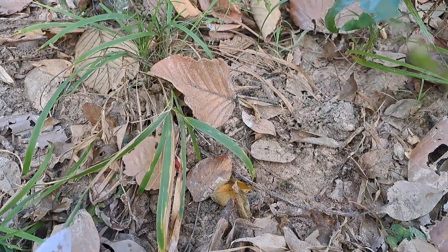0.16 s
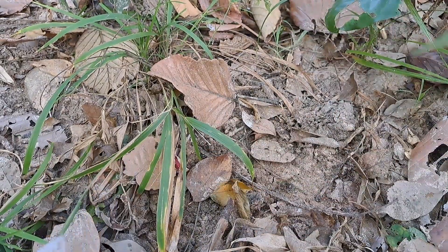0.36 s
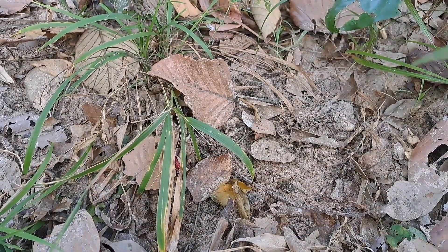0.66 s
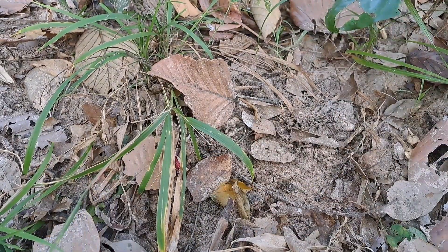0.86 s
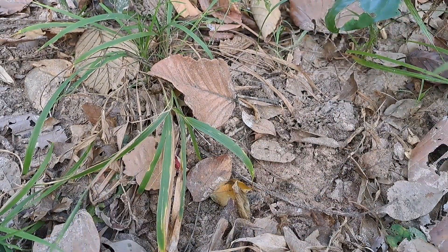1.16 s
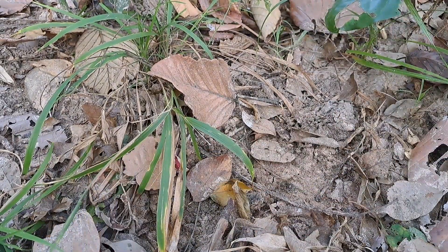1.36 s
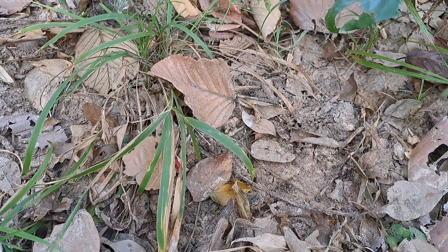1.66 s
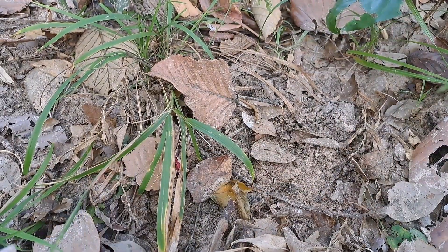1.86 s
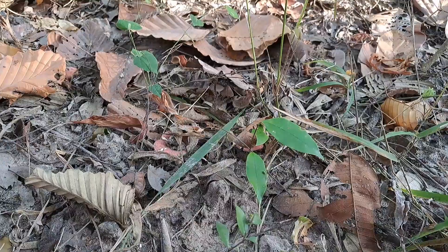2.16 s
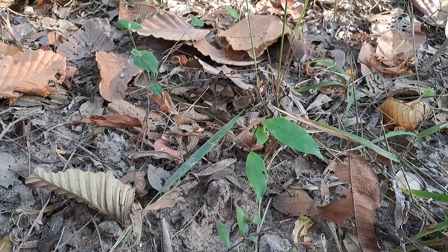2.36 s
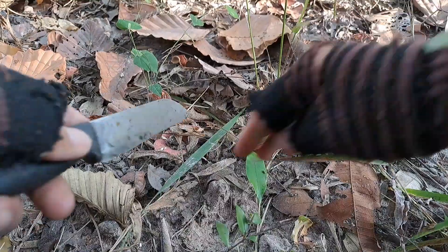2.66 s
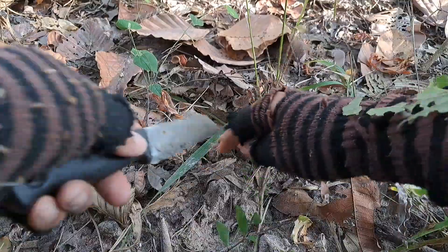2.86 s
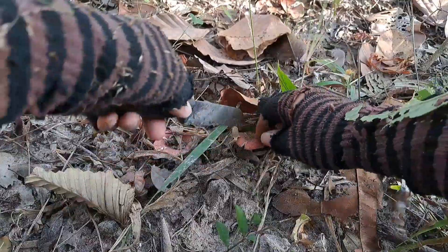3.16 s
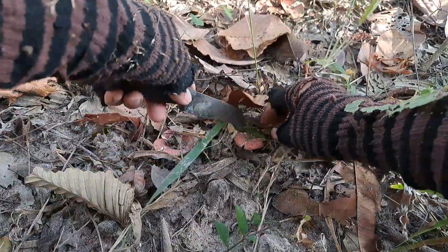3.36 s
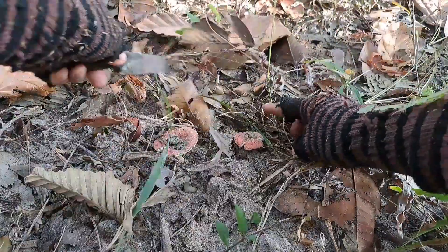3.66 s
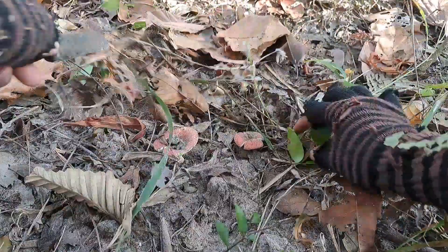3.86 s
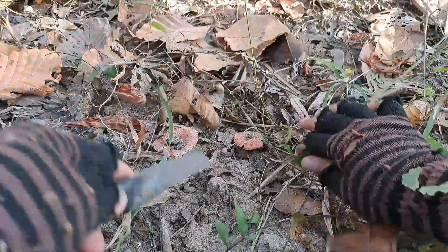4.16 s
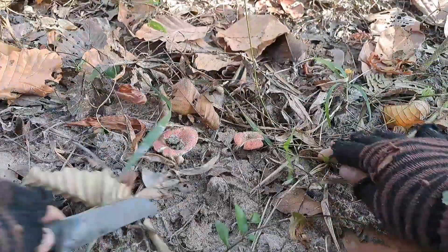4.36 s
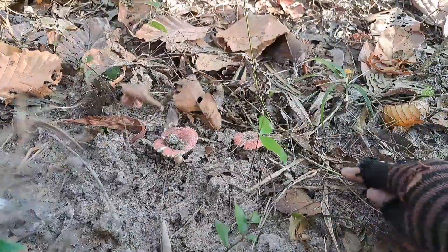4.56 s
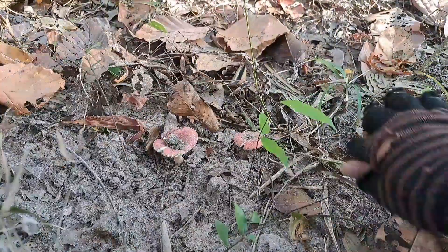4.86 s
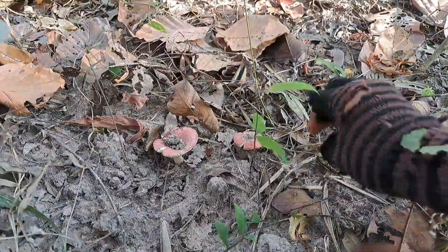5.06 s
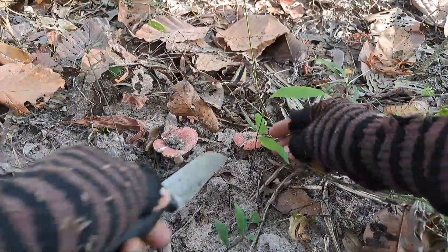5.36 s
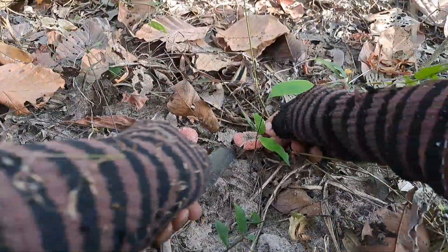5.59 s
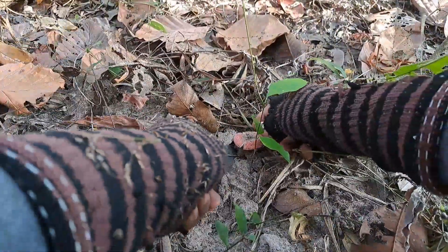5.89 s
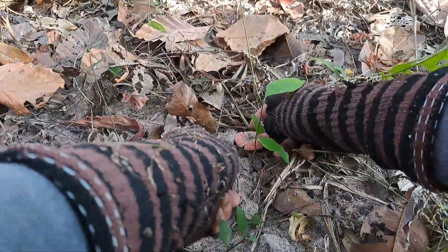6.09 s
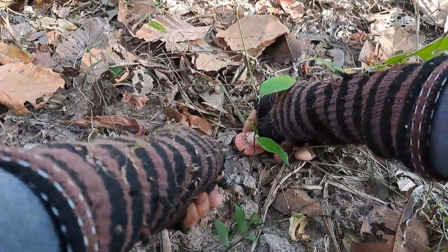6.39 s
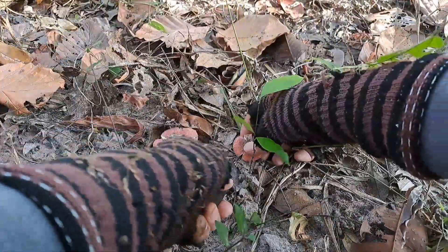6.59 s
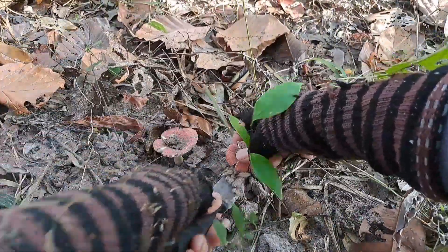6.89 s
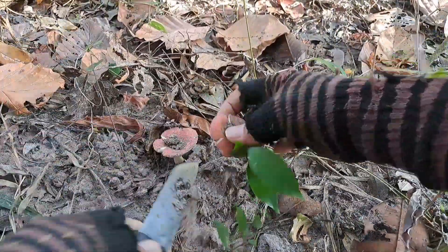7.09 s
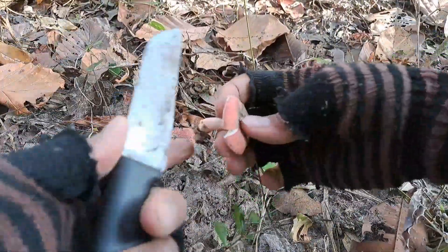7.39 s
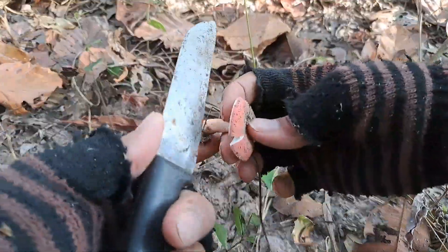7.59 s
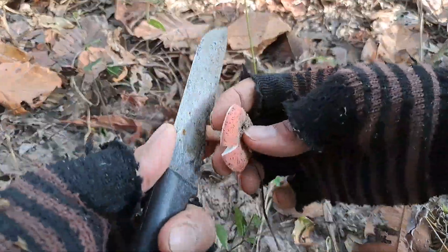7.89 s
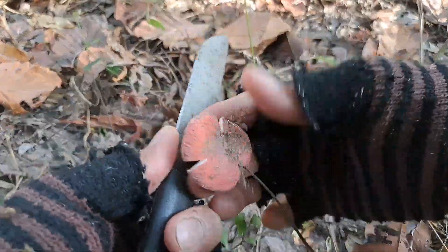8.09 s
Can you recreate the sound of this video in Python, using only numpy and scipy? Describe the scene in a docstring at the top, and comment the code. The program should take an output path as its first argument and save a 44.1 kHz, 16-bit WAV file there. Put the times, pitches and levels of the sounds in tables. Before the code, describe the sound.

Dry leaves rustle with tiny metal clinks, then gloved hands rake and sweep crackling litter aside before a knife quietly cuts into soil.

```python
"""Leaf litter stirs underfoot and a small piece of metal clinks; two broad sweeps and quiet cutting follow.
Forest floor, microphone ports of a handled camera close to gloved hands and a knife: dry leaves are raked
off, then a small mushroom is dug out. Strokes drive crowds of grains and friction noise for soil, scraping and
crackle. Noise bursts make the snaps and soft blows, damped sines the firm thumps, excited modes the clinks,
narrow resonances the blade. A thin whistle, soft low rumble and the hush of the wood lie behind."""
import sys
import numpy as np
from scipy import signal
from scipy.fft import rfft, irfft, next_fast_len
from scipy.io import wavfile
from scipy.ndimage import uniform_filter1d, map_coordinates

SR = 44100
rng = np.random.default_rng(int(sys.argv[2]) if len(sys.argv) > 2 else 0)


def wav_record(signal):
    """Record a signal, one row per channel, as 16-bit PCM in the file named by sys.argv[1]."""
    frames = np.transpose(np.atleast_2d(signal))
    bounded = np.clip(frames, -1, 1)
    # unit amplitude maps onto the largest positive 16-bit level
    quanta = np.round(bounded * 32767).astype(np.int16)
    wavfile.write(sys.argv[1], SR, quanta)


N = 363207
TIME = np.arange(N) / SR

# Strokes of hand, foot or blade through the litter: fastest moment t/s, rise/s, fall/s,
# level/dB before the layer gains, pressure on the soil/dB, left-right/dB
STROKE_MOVES = [(.045, 0.056, 0.067, -46, -40, 2.5), (.144, 0.098, 0.16, -45.5, -3, .5),
                (.335, 0.017, 0.084, -60.5, 6.5, -2), (.57, 0.39, 0.022, -51, -16.5, 1),
                (.745, 0.14, 0.15, -54.5, -14.5, -1), (.86, 0.016, 0.047, -44.5, -24, 1),
                (.907, 0.045, 0.059, -48.5, -1, -0.5), (1.037, 0.13, 0.052, -51, -5.5, 0.5),
                (1.164, 0.044, 0.045, -49.5, 1.5, 1.5), (1.305, 0.18, 0.21, -63.5, 3.5, 0),
                (1.445, 0.045, 0.23, -55, -0.5, -0.5), (1.596, 0.057, 0.028, -55, -4, -1),
                (1.795, 0.02, 0.028, -63, 6.5, -1), (1.875, 0.018, 0.016, -59.5, -10, -11),
                (1.963, .003, 0.04, -55, -1, -5), (2.013, 0.03, 0.09, -50.5, -3.5, -2.5),
                (2.278, 0.1, 0.067, -51.5, -8.5, -5), (2.38, .06, .06, -72, -2, 0),
                (2.658, 0.13, 0.12, -54.5, -8, -1.5), (2.77, 0.043, 0.043, -54, 4, -1.5),
                (2.93, 0.028, 0.033, -34.5, -13.5, 0.5), (2.97, 0.61, 0.25, -47, -7.5, -1),
                (3.125, 0.033, 0.1, -44, -11.5, 0.5), (3.28, 0.18, 0.2, -45.5, -7.5, -1),
                (3.463, 0.037, 0.1, -28.5, -13.5, -1), (3.551, 0.063, 0.022, -31.5, -7, -1.5),
                (3.672, 0.073, 0.24, -32.5, -13, -1), (3.834, 0.035, 0.03, -34.5, 0, -2),
                (3.95, .25, 0.65, -49, -8, -3), (4.199, 0.019, 0.048, -35.5, -15.5, -4.5),
                (4.42, 0.23, .15, -47, -7, -6), (4.538, 0.12, 0.12, -27, -13, .5),
                (4.656, 0.025, 0.15, -28.5, -12.5, 1), (4.81, 0.042, 0.13, -42, -4, -2.5),
                (5.03, 0.041, 0.26, -57, -13, -3), (5.231, 0.074, 0.16, -57, -3.5, -2.5),
                (5.358, 0.036, 0.09, -43, -13, -4.5), (5.729, 0.3, 0.35, -50.5, -4.5, -2.5),
                (5.895, 0.084, 0.22, -57.5, -13, -2.5), (6.026, 0.028, 0.097, -51, -9.5, -3.5),
                (6.33, 0.13, 0.22, -56, -6, -5), (6.45, 0.065, 0.1, -51, -10, -3),
                (6.535, 0.03, 0.078, -50, -15, -2.5), (6.67, 0.065, 0.13, -52.5, -7, -2),
                (6.793, 0.092, 0.13, -49, -10, -2), (6.92, 0.084, 0.22, -47.5, -13, -1.5),
                (6.997, 0.041, .03, -46, -15, -4), (7.19, 0.11, 0.16, -48.5, -10.5, -2),
                (7.46, 0.15, 0.16, -61.5, -8, -3.5), (7.968, 0.017, 0.032, -56, -8, 1),
                (8.035, 0.037, 0.064, -60, -25, -1.5), (8.2, 0.084, 0.13, -67.5, -18, -3)]
STROKE_DROP_DB, STROKE_SHAPE = 9.5, 1.25  # drop one rise or fall from the peak; 1 = pointed, 2 = rounded
SCRAPE_PER_PRESSURE = 0.45  # dB of scraping for each dB of pressure
# Spells of work: from t/s, to t/s
SHUFFLING, RAKING, SWEEPING, DIGGING = (0, 1.962), (1.962, 4.1), (4.1, 5.1), (5.1, 8.3)
# Colour of the litter in each spell: f/Hz, relative level/dB per Hz
SHUFFLE_SPECTRUM = [(120, -31), (200, -8), (278, -11.5), (450, -10), (690, -6.5), (1070, -6.5), (1330, -16),
                    (1710, -13), (3010, -11.5), (4330, -13), (5110, -14.5), (5700, -13.5), (9480, -14.5),
                    (12700, -11.5), (15500, -12)]
RAKE_SPECTRUM = [(150, -24), (260, -10), (420, -9.5), (561, -14.5), (678, -5.5), (1060, -3.5), (1190, -8.5),
                 (1410, -6.5), (2360, -2.5), (3620, -4.5), (5280, -4.5), (7950, -3), (8970, -6.5),
                 (12800, -1), (15500, -3)]
SWEEP_SPECTRUM = [(150, -10), (260, -8.5), (309, -10), (354, -14.5), (481, -10), (591, -4), (906, -1),
                  (1110, -9.5), (1490, -6), (1790, -5.5), (2360, -3), (3680, -4.5), (9940, -4), (12600, 0),
                  (15500, -1.5)]
DIG_SPECTRUM = [(150, -33), (260, -2), (427, -1), (611, -6.5), (713, 6), (832, 5.5), (1090, 1.5),
                (1230, -10), (1410, -12.5), (2530, -4), (4150, -7), (5280, -6), (9600, -7), (12600, -4),
                (15500, -3.5)]
# Stalks and leaf ribs that break: t/s, peak level/dB before the layer level, woody part/dB before its cap,
# left-right/dB, t60 of the crack/s
STALK_SNAPS = [(.3235, -35.5, -10, 4, .012), (.3352, -41, -5, 2, .012), (0.5885, -28, -5, -11, .009),
               (0.7197, -33.5, -2, 1, 0.015), (0.8037, -30, -12.5, -17, 0.017),
               (0.8342, -31, -25, 4, 0.018), (1.099, -36, -13, 1, .016), (1.1162, -37, -17, 5, .008),
               (1.725, -43.5, -4.5, -8, 0.007), (1.790, -41.5, -2, -6, 0.013),
               (1.8824, -36, -2, -25, 0.0051), (2.297, -33, -16, -20, 0.0051),
               (2.3992, -45, -24.5, 8.5, .007), (2.493, -37, -1, -4, .012), (2.58, -41, -12, 4, .011),
               (2.7688, -31, -9, -5.5, 0.0071), (2.8987, -30, 1, -3.5, .008), (2.9274, -21.5, -14, 1, .012),
               (2.9341, -16.5, -15, -4, 0.013), (3.0172, -33, -1, -2, 0.0076),
               (3.2073, -26.5, 2, 1, 0.0097), (3.2978, -20.5, -10, 2, 0.016), (3.3772, -27.5, -21, 1, .008),
               (3.456, -12.5, -27, -3, .02), (3.536, -11, -25, -4, 0.014), (3.548, -12, -22, -6, 0.024),
               (3.7342, -22, -29, 2, .008), (3.9577, -23.5, -13, -3, .013),
               (4.143, -20.5, -2.5, 0.5, 0.0073), (4.192, -19.5, -23, -8, 0.019),
               (4.1979, -10.5, -21, -8, .011), (4.302, -24.5, -17, -5, .014), (4.661, -24, -7, 14.5, 0.011),
               (4.977, -34.5, -21, 5, .008), (5.342, -31.5, -20, -4, .009), (5.362, -30, -9, -6, .01),
               (5.3729, -19, -13, -12, .022), (5.629, -33, -19.5, -6, .007),
               (5.8324, -30.5, -3, -5.5, 0.016), (5.850, -35, -16, -1, .014), (6.279, -41, 3, -4, 0.01),
               (6.662, -41.5, 3, -6, .009), (6.9876, -26.5, -1.5, -4, 0.0059), (7.003, -32, -10, 1, .009),
               (7.2868, -35, -9, -8, 0.01), (7.3724, -41, -5, -4, .012), (7.4392, -44, -14, -11, 0.0068),
               (7.5074, -37, -26, 3, 0.011), (7.5462, -41, -29, -5, .008), (7.9687, -33.5, -7.5, -1, .008),
               (8.180, -46, -26, 2.5, .008)]
# A knee, hand or clod meets the earth: t/s, peak level/dB before the layer level and firmness share, f/Hz,
# firmness 0-1 (loose soil crunches, firm soil thumps)
EARTH_BLOWS = [(.144, -32, 580, .1), (.221, -39, 210, 0.96), (.272, -34.5, 201, 0.89),
               (.324, -34, 696, 0.25), (.336, -36.5, 734, 0.27), (.908, -27, 740, 0.2),
               (1.151, -37, 170, 0.56), (1.433, -30.5, 477, 0.15), (1.507, -40, 300, 0.76),
               (1.54, -30, 464, 0.55), (1.592, -36.5, 360, .1), (1.637, -33, 520, .1),
               (2.339, -42, 164, 0.59), (2.41, -47, 324, 0.66), (2.475, -40.5, 288.5, 0.79),
               (2.525, -48.5, 279, .3), (3.808, -24.5, 402, 0.2), (3.831, -28, 288, 0.85),
               (4.005, -38, 300, 0.44), (4.517, -25.5, 296, 1), (4.846, -33.5, 122, 1),
               (5.048, -41.5, 372, 0.83), (5.239, -45.5, 390, 0.88), (5.505, -50, 272, 0.72),
               (5.539, -51, 398, 0.84), (5.66, -47, 380, 1), (5.735, -41, 800, .3),
               (7.28, -39.5, 246, 0.64), (7.373, -43.5, 517, 0.42)]
# Contacts of the small metal piece: t/s, level/dB before the layer level, left-right/dB, chatter t60/s,
# lasting ring relative to the contact/dB, ring rise/s, ring t60/s
METAL_CONTACTS = [(0.3503, -19, -22, 0.01, -22, .001, .2), (0.4003, -27.5, -4, .016, -25, .001, .06),
                  (1.4023, -34, -3, .008, -7, .0005, 0.045), (1.449, -31, -10, .007, -26, .001, .03),
                  (1.471, -35, -6.5, .025, -14, .001, .04), (1.4782, -24, -5, 0.0079, -22, .001, .03),
                  (1.5402, -29, -4, .008, -25, .001, .15), (1.5435, -24.5, -3, .01, -25, .001, .05),
                  (1.6403, -16.5, 0, .022, -18, .0005, .1), (1.6454, -21, 7, 0.024, -21, .001, 0.12),
                  (1.6668, -31, 3, 0.027, -6, .002, .06), (1.670, -53.5, 10, .02, 19.5, .013, 0.078)]
# Damped modes of the metal: f/Hz, width/Hz, level/dB
METAL_MODES = [(6990, 200, 8.5), (13500, 330, 3), (13500, 280, 17), (13900, 330, 3)]
RING_HZ = 12310  # the mode that rings on
# Blade grating over grit or flesh: middle t/s, length/s, f/Hz, width/Hz before widening, level/dB before slips
BLADE_GRATES = [(4.569, 0.073, 2390, 260, -37.5), (4.529, 0.042, 2750, 593, -34),
                (5.378, 0.032, 1900, 900, -43.5), (5.701, .016, 2100, 900, -56),
                (6.549, 0.15, 1020, 250, -62.5), (6.569, 0.11, 2500, 700, -55.5),
                (6.831, 0.18, 2950, 800, -55), (6.943, .1, 2550, 700, -55.5),
                (6.992, 0.03, 4930, 1190, -48), (7.373, 0.0064, 1300, 1200, -54.5),
                (7.912, 0.035, 5550, 1200, -64.5), (7.939, 0.017, 5700, 2010, -57.5),
                (7.9603, 0.0069, 5340, 1600, -44), (7.9695, 0.0024, 5300, 1400, -42),
                (8.033, 0.105, 5120, 1000, -59.5), (8.068, 0.013, 4300, 900, -64)]
# Deep handling rumble: t/s, level/dB before the layer level
HANDLING_LEVEL = [(0.0, -60), (0.14, -59), (1.08, -69), (1.17, -46), (1.33, -79), (1.51, -56), (1.63, -84),
                  (1.72, -61), (4.4, -58), (4.63, -52), (5.18, -68.5), (5.39, -58), (6.77, -65), (7.2, -53),
                  (7.22, -58.5), (7.52, -54), (7.55, -67), (8.24, -60)]
# Colour of the low rumble: f/Hz, relative level/dB per Hz
RUMBLE_SPECTRUM = [(13, -49.5), (22, -20), (40, -7.5), (59, 5.5), (72, -2.5), (97, -5.5), (118, -3.5),
                   (162, -3.5), (193, -7.5), (241, -4.5), (305, -16), (420, -11.5), (550, -51), (920, -120)]
# Thin whistle: t/s, f/Hz before waver, level/dB before flutter
WHISTLE_GLIDE = [(5.73, 6650, -89), (5.75, 6530, -50), (5.81, 6100, -52), (5.855, 5260, -47.5),
                 (5.89, 5540, -57), (5.93, 6540, -51), (5.943, 7060, -50), (5.96, 7450, -85)]
# Colour of the quiet wood: f/Hz, relative level/dB per Hz
AIR_SPECTRUM = [(200, 3.5), (420, -9.5), (630, -8.5), (950, -24), (1400, -18.5), (1800, -21.5),
                (3000, -25.5), (14000, -25.5)]
# Stereo width at the two ports: f/Hz, side relative to mid level/dB
STEREO_WIDTH = [(60, -16.5), (160, -14), (270, -15), (450, -9), (740, -6.5), (950, -5), (1180, -0.5),
                (1500, -3), (2100, -0.5), (3300, .5), (14000, 0.1)]
TOP_HZ = 15750  # band limit of the camera


def strokes():
    """Each stroke swells and fades; harder pressure adds soil and scraping. Left and right gains per layer."""
    coarse_time = TIME[::32]
    power = np.zeros((3, 2, len(coarse_time)))
    for s, rise, fall, db, press_db, pan_db in STROKE_MOVES:
        from_peak = coarse_time - s
        distance = np.abs(from_peak / np.where(from_peak < 0, rise, fall))
        speed_db = db - STROKE_DROP_DB * distance ** STROKE_SHAPE
        for layer, share in zip(power, (1, SCRAPE_PER_PRESSURE, 0)):  # soil, scrape, crackle
            layer += (amp(speed_db + share * press_db) * panned(pan_db)) ** 2
    return np.array([[np.interp(TIME, coarse_time, port) for port in layer] for layer in np.sqrt(power)])


def work(spell, colour, texture, gains, soil_db, scrape_db, crackle_db):
    """One spell of work in the litter: soil, scraping and crackle follow the strokes."""
    soil, scrape, crackle = gains
    ranges_hz = (230, 1400), (1200, 4200), (3900, 19000)
    crumbs, edges, blades = [
        spread(x, lambda hz: amp(along(colour, hz)) * band(hz, *limits))
        for x, limits in zip(texture, ranges_hz)]
    sound = amp(soil_db) * soil * crumbs * panned(-1.4)
    sound += amp(scrape_db) * scrape * edges * panned(-0.44)
    sound += amp(crackle_db) * crackle * blades * panned(0.45)
    active = 1. * (TIME >= spell[0]) * (TIME < spell[1])
    return sound * uniform_filter1d(active, size=300)  # short crossfade


def textures():
    """Crumbs, leaf edges and brittle blades: each a crowd of grains on a bed of friction noise."""
    crumbs = grains(rate=450, low_hz=248.6, high_hz=1514, cycles=1.9, scatter_db=1.0, size=700)
    edges = grains(rate=1000, low_hz=1267, high_hz=4254, cycles=4.4, scatter_db=0.0, size=260)
    blades = grains(rate=1600, low_hz=3760, high_hz=14400, cycles=0.65, scatter_db=0.5, size=90)
    catching = catches(rate=70, release_s=.005, depth=1.1)

    def bed(db):
        return amp(db) * rng.standard_normal((2, N))
    crowds = [patchy(crumbs + bed(1), depth_db=2.0),
              patchy(edges + bed(1), depth_db=3.5),
              patchy(blades + bed(4.3), depth_db=3)]
    return [crowd * catching for crowd in crowds]


def grains(rate, low_hz, high_hz, cycles, scatter_db, size):
    """Tiny fractures: rings of random time, pitch and strength, two random phases, decaying over cycles."""
    chance = rng.random((int(rate * N / SR), 5))
    start, pitch, force = chance.T[:3, :, None]
    turns = low_hz * (high_hz / low_hz) ** pitch * np.arange(size) / SR
    strength = amp(-scatter_db * np.log(force + .04))  # the offset caps the loudest
    fade = strength * np.exp(-turns / cycles)
    at = ((start * N).astype(int) + np.arange(size)).ravel()
    rings = [fade * np.sin(2 * np.pi * (turns + phase[:, None])) for phase in chance.T[3:]]
    return unit(np.array([np.bincount(at, ring.ravel(), N)[:N] for ring in rings]))


def catches(rate, release_s, depth):
    """Leaves catch and tear free at random: all grains jump together and die back. Gain of rms 1."""
    chance = rng.random((int(rate * N / SR), 2))
    jerks = np.bincount((chance[:, 0] * N).astype(int), chance[:, 1] ** 2, N)
    decay = np.exp(-1 / (release_s * SR))
    return unit(1 + depth * signal.lfilter([1], [1, -decay], jerks))


def patchy(pair, depth_db):
    """Each leaf that is touched sounds in its own range: the colour shifts from moment to moment."""
    z = signal.stft(pair, nperseg=512)[2]
    field = rng.standard_normal(z.shape[1:])
    narrow = uniform_filter1d(uniform_filter1d(field, size=4, axis=0), size=12, axis=1)
    broad = uniform_filter1d(uniform_filter1d(field, size=22, axis=0), size=3, axis=1)
    # narrow patches weaken towards the treble
    low = 1 / (1 + np.linspace(0, SR / 2, len(field))[:, None] / 5000)
    depth = 1.01 * np.tanh(low * unit(narrow) + 0.42 * unit(broad))
    return signal.istft(z * amp(depth_db * depth), nperseg=512)[1][:, :N]


def aside(pair, lag_ms, focus):
    """Work off to the left reaches the left port first; focus is the share that arrives directly."""
    def ports(hz):
        direct = np.clip(focus, 0, .95) * band(hz, 380, 4000)
        return np.sqrt([1 + direct, 1 - direct])

    def lead(hz):
        return np.exp(1j * np.pi * hz * lag_ms * 1e-3 * np.array([[1], [-1]]))
    mid, side = filtered(np.array([pair[0] + pair[1], pair[0] - pair[1]]) / 2, ports)
    return filtered(np.array([mid + side, mid - side]), lead)


def splinters(gains, level_db):
    """Now and then a single dry leaf cracks above the crowd, following the scraping gain of the strokes."""
    cracks = grains(rate=50, low_hz=1400, high_hz=5500, cycles=2.8, scatter_db=5, size=260)
    return amp(level_db) * gains[1] * cracks


def clods(soil, level_db):
    """Lumps of earth and curled leaves knock hollowly, each at its own pitch, wherever soil is pushed."""
    knocks = grains(rate=60, low_hz=280, high_hz=1050, cycles=5, scatter_db=3, size=2200)
    return amp(level_db) * soil * spread(knocks, lambda hz: band(hz, 200, 2000))


def snaps(level_db, rise, after_db, after_t60):
    """A stalk tears and breaks with a sharp crack, and the leaves around it shiver briefly."""
    out, t = np.zeros((2, N)), np.arange(4096) / SR
    shiver = amp(after_db - 60 * t / after_t60)
    for s, db, wood_db, pan_db, crack_t60 in STALK_SNAPS:
        fade = np.minimum(t / rise, 1) ** 2 * (amp(-60 * (t - rise) / crack_t60) + shiver)
        wood = min(amp(wood_db), .9)  # thick stalks crack lower than thin blades

        def colour(hz):
            return 3 * wood * band(hz, 1690, 4950) + np.sqrt(1 - wood ** 2) * band(hz, 5450, 21000)
        crack = filtered(fade * rng.standard_normal((2, len(t))), colour)
        crack /= np.abs(crack).max(axis=1, keepdims=True)
        add(out, s, amp(db + level_db) * panned(pan_db) * crack)
    return out


def bumps(level_db, t60):
    """Soft blows on loose ground: noise in a broad resonance that dies almost at once."""
    out, t = np.zeros((2, N)), np.arange(4096) / SR
    for s, db, pitch_hz, firm in EARTH_BLOWS:
        noise = rng.standard_normal((2, len(t)))
        thud = spread(noise, lambda hz: resonance(hz, pitch_hz, .8 * pitch_hz) * band(hz, 100, 2900))
        thud *= amp(-60 * t / t60) * (1 - np.exp(-t / 0.001))
        loose = np.sqrt(np.clip(1 - firm, 0, 1))
        add(out, s, amp(db + level_db) * loose * thud / np.abs(thud).max())
    return out


def thumps(level_db, cycles):
    """Firm earth gives under a weight: a damped sine that falls 60 dB in the given number of cycles."""
    out, t = np.zeros((2, N)), np.arange(8192) / SR
    for s, db, pitch_hz, firm in EARTH_BLOWS:
        ring = amp(db + level_db - 60 * t * pitch_hz / cycles) * np.sin(2 * np.pi * pitch_hz * t)
        add(out, s, panned(-1) * np.sqrt(np.clip(firm, 0, 1)) * ring)
    return out


def clinks(level_db, tick):
    """Small metal: chatter excites damped modes and one that rings on; a sliding touch lets it swell."""
    out, t = np.zeros((2, N)), np.arange(8192) / SR

    def body(hz):  # tick is the unresonant share
        return tick + sum(amp(db) * resonance(hz, centre, width) for centre, width, db in METAL_MODES)
    for s, db, pan_db, contact_t60, ring_db, ring_rise, ring_t60 in METAL_CONTACTS:
        contact = filtered(amp(-60 * t / contact_t60) * rng.standard_normal((2, len(t))), body)
        contact /= np.abs(contact).max(axis=1, keepdims=True)
        swell = np.minimum(t / ring_rise, 1)
        ring = swell * amp(ring_db - 60 * np.maximum(t - ring_rise, 0) / ring_t60)
        ring = ring * np.sin(2 * np.pi * (RING_HZ * t + rng.random()))
        add(out, s, amp(db + level_db) * panned(pan_db) * (contact + ring))
    return out


def blade(slips_per_s, slip_db):
    """Each drag of the knife sticks and slips unevenly, swelling and fading in a narrow resonance."""
    out = np.zeros((2, N))
    slips = amp(slip_db * np.tanh(wobble(slips_per_s)))
    for s, length, centre_hz, width_hz, db in BLADE_GRATES:
        swell = np.hanning(int(length * SR)) ** .5
        friction = slips[round(s * SR):][:len(swell)] * rng.standard_normal((2, len(swell)))
        grate = spread(friction, lambda hz: resonance(hz, centre_hz, 1.1 * width_hz) ** 2)
        add(out, s - length / 2, amp(db) * swell * grate * panned(-2.2))
    return out


def rumble(soil, arms_db, ground_db, ground_growth, deep_db):
    """Low, uneven noise of the camera and of moving arms; the ground rumbles along when soil is pushed."""
    deep, = curves(HANDLING_LEVEL)
    arms = amp(arms_db + 0.5 * (deep - deep.mean()) + 3.3 * wobble(9))
    ground = amp(ground_db) * (soil.mean(axis=0) / soil.max()) ** ground_growth

    def noise(low_hz, high_hz):
        pair = rng.standard_normal((2, N))
        return spread(pair, lambda hz: amp(along(RUMBLE_SPECTRUM, hz)) * band(hz, low_hz, high_hz))
    upper = np.hypot(arms, ground) * noise(100, 270)
    return panned(-0.93) * (upper + amp(deep + deep_db) * noise(35, 98))


def whistle():
    """A faint thin whistle, perhaps a far bird: a wavering, fluttering sine that dips and rises."""
    hz, db = curves(WHISTLE_GLIDE)
    waver = .027 * wobble(700)
    flutter_db = 6 * np.tanh(wobble(130)) - 4.5
    phase = 2 * np.pi * np.cumsum(hz * (1 + waver)) / SR
    sounding = (TIME > WHISTLE_GLIDE[0][0]) * (TIME < WHISTLE_GLIDE[-1][0])
    return amp(db + flutter_db) * np.sin(phase) * sounding


def air(level_db):
    """The faint steady hush among the trees: coloured noise."""
    noise = rng.standard_normal((2, N))
    return amp(level_db) * spread(noise, lambda hz: amp(along(AIR_SPECTRUM, hz)) * band(hz, 280, 19000))


def amp(db):
    """Decibels to gain."""
    return 10 ** (np.asarray(db) / 20)


def unit(x):
    """Scaled to rms 1."""
    return x / np.sqrt(np.mean(x ** 2) + 1e-20)


def along(points, hz):
    """Values of (f/Hz, value) points, interpolated on a log frequency axis."""
    f, v = np.transpose(points)
    return np.interp(np.log(hz + 1), np.log(f + 1), v)


def curves(rows):
    """One value per sample for each column after the time."""
    s, *cols = np.transpose(rows)
    return [np.interp(TIME, s, c) for c in cols]


def wobble(rate):
    """A smooth random curve, rate knots a second."""
    return map_coordinates(rng.standard_normal(int(N * rate / SR) + 4), [TIME * rate], order=2)


def filtered(x, response):
    """x passed through a response of frequency."""
    n = x.shape[-1]
    m = next_fast_len(n + 4096, True)
    return irfft(rfft(x, m) * response(np.fft.rfftfreq(m, 1 / SR)), m)[..., :n]


def band(hz, low_hz, high_hz):
    """Gain of a steep band-pass."""
    return ((1 + (low_hz / (hz + 1)) ** 10) * (1 + (hz / high_hz) ** 10)) ** -.5


def resonance(hz, centre_hz, width_hz):
    """Causal response of one damped mode."""
    return 1j * hz * width_hz / (centre_hz ** 2 - hz ** 2 + 1j * hz * width_hz)


def panned(db):
    """Left and right gains for a level difference."""
    gains = amp(np.array([[.5], [-.5]]) * db)
    return gains / np.sqrt(np.mean(gains ** 2, axis=0))


def spread(pair, response):
    """Two signals as mid and side of coloured stereo, mid of rms 1: low sound reaches both ports alike."""
    def mid_side(hz):
        return response(hz) * np.array([np.ones(len(hz)), amp(along(STEREO_WIDTH, hz))])
    mid, side = filtered(pair, mid_side)
    return np.array([mid + side, mid - side]) / np.std(mid)


def add(track, s, sound):
    """Mix a sound into the track at time s."""
    part = track[:, max(round(s * SR), 0):][:, :sound.shape[1]]
    part += sound[:, :part.shape[1]]


def scene():
    """Four spells of work with their small events, in the open air."""
    texture, gains = textures(), strokes()
    shuffling = work(SHUFFLING, SHUFFLE_SPECTRUM, texture, gains, soil_db=-0.5, scrape_db=-3.0, crackle_db=0.0)
    raking = work(RAKING, RAKE_SPECTRUM, texture, gains, soil_db=-2, scrape_db=-5.5, crackle_db=-1.0)
    sweeping = work(SWEEPING, SWEEP_SPECTRUM, texture, gains, soil_db=-2.5, scrape_db=-2.8, crackle_db=-0.8)
    digging = work(DIGGING, DIG_SPECTRUM, texture, gains, soil_db=-4.5, scrape_db=-3.5, crackle_db=0.0)
    litter = aside(shuffling, lag_ms=0.493, focus=0.43) + raking
    litter += aside(sweeping, lag_ms=0.333, focus=0.27) + digging
    litter += splinters(gains, level_db=-14) + clods(gains[0], level_db=-10)
    hits = snaps(level_db=0.5, rise=0.0006, after_db=-22, after_t60=0.13)
    hits += bumps(level_db=-4.0, t60=0.037) + thumps(level_db=-0.5, cycles=10.6)
    metal = clinks(level_db=-1, tick=0.18) + blade(slips_per_s=480, slip_db=3.5)
    low = rumble(gains[0], arms_db=-65.5, ground_db=-47.5, ground_growth=0.63, deep_db=0.5)
    return litter + hits + metal + low + whistle() + air(level_db=-72)


def record(dry):
    """The camera keeps nothing above its band limit."""
    return filtered(dry, lambda hz: hz < TOP_HZ)


dry = scene()
out = record(dry)
wav_record(out)
```